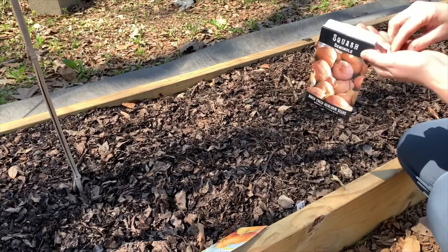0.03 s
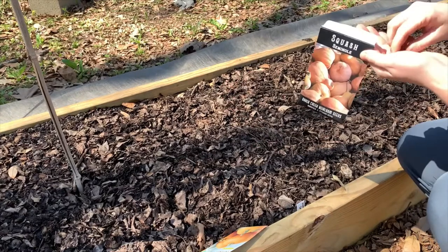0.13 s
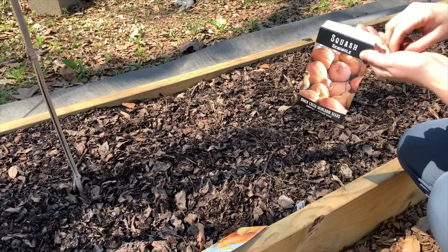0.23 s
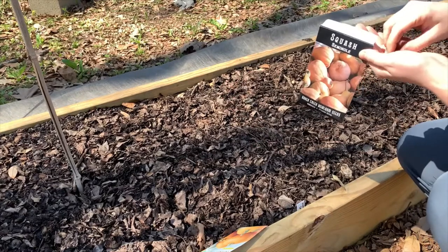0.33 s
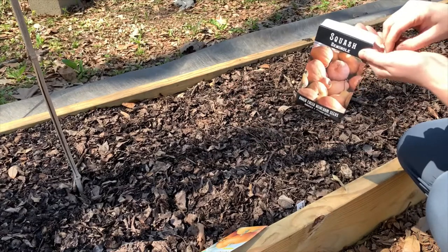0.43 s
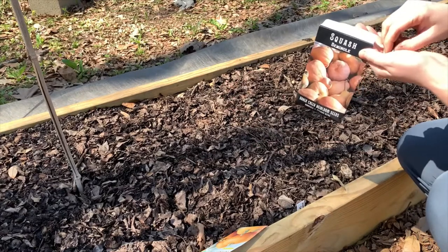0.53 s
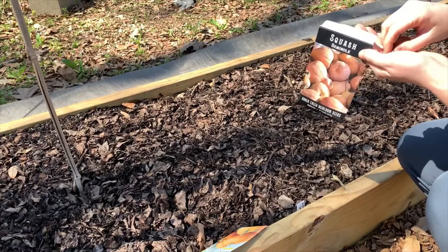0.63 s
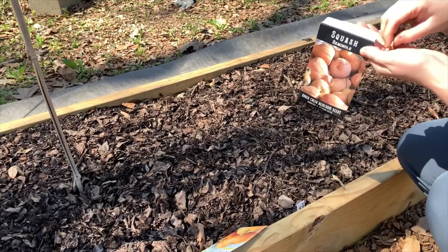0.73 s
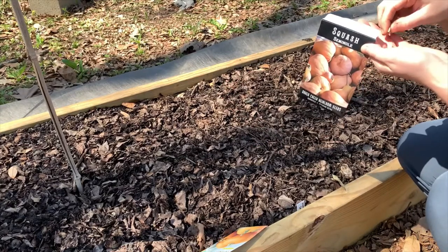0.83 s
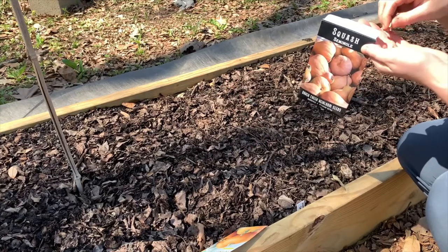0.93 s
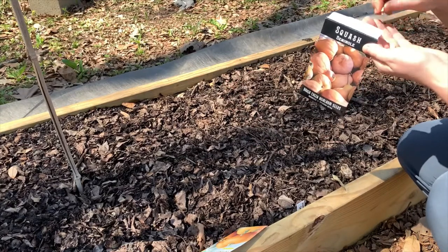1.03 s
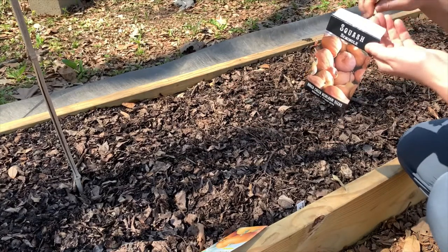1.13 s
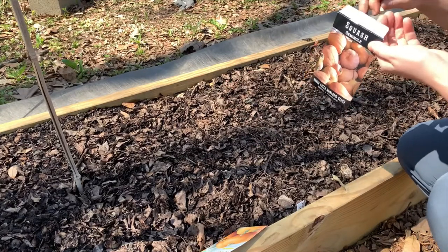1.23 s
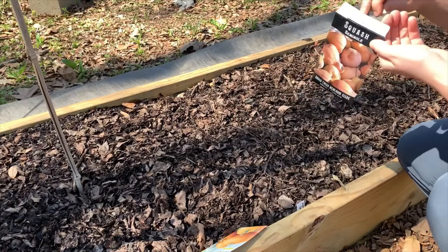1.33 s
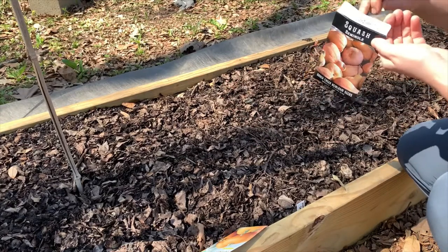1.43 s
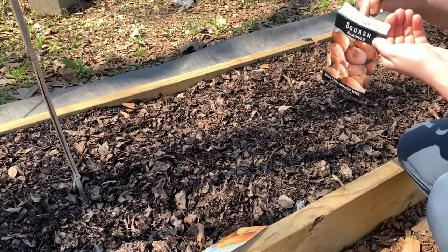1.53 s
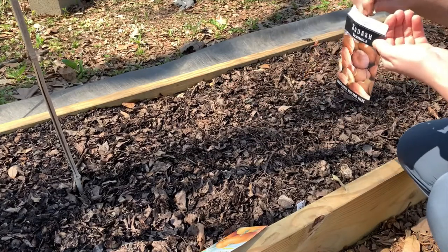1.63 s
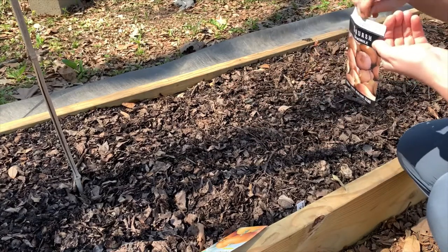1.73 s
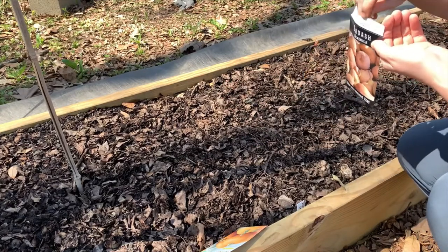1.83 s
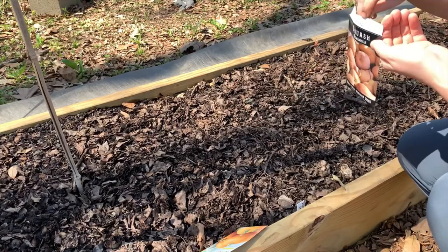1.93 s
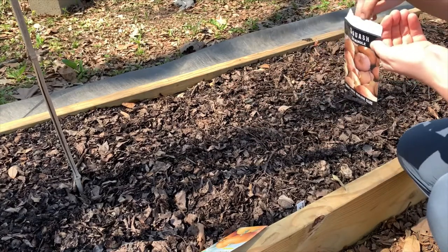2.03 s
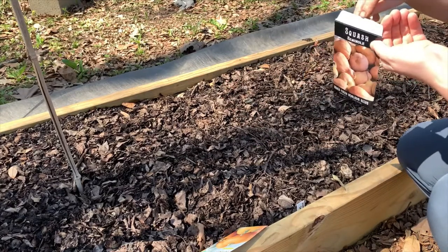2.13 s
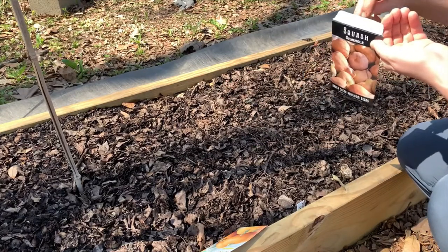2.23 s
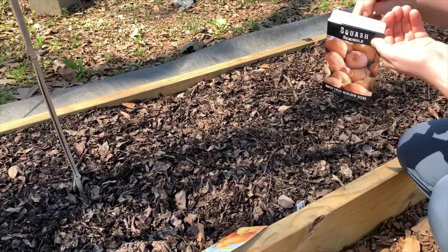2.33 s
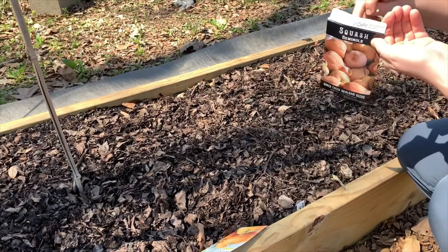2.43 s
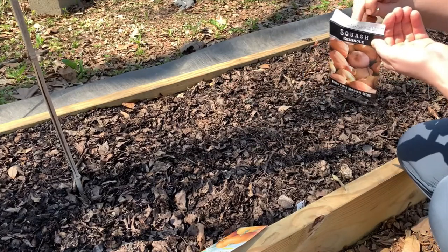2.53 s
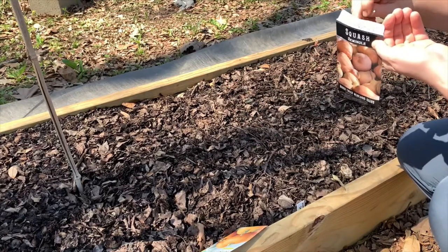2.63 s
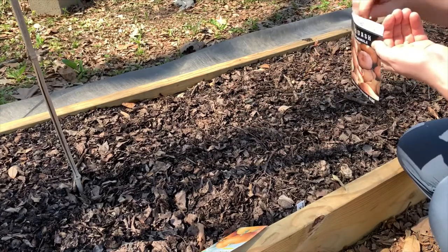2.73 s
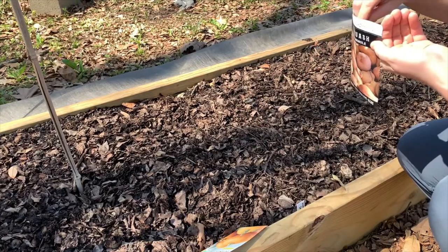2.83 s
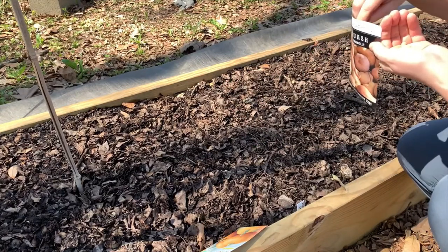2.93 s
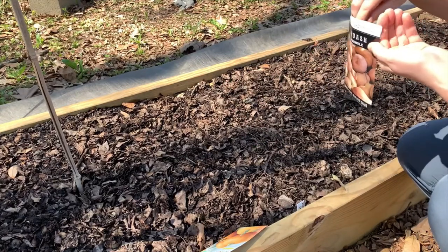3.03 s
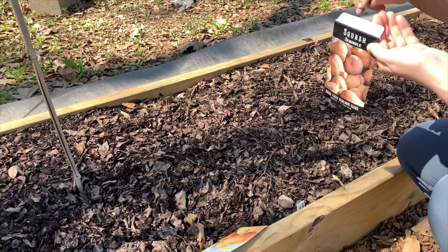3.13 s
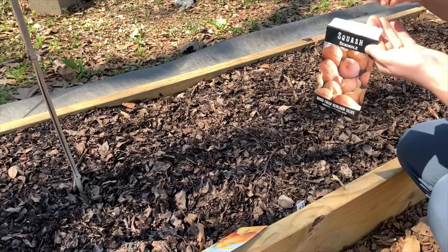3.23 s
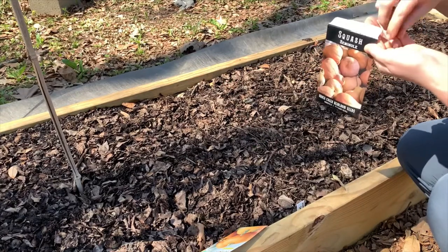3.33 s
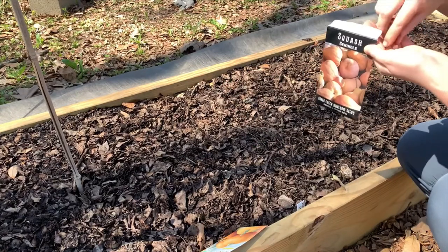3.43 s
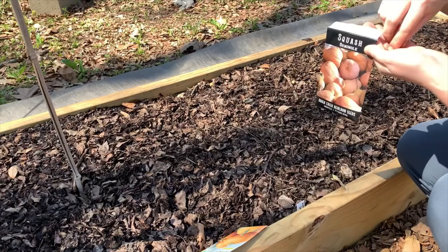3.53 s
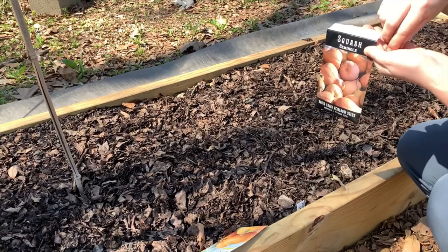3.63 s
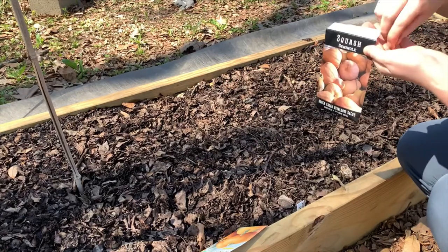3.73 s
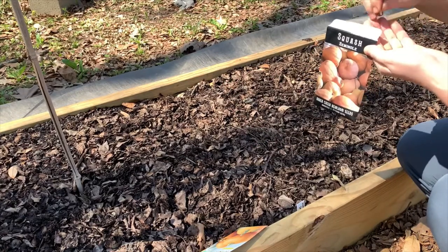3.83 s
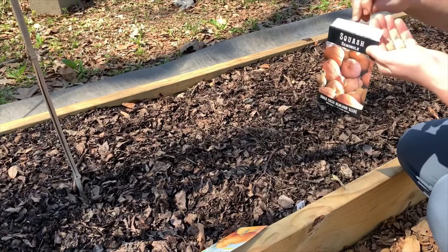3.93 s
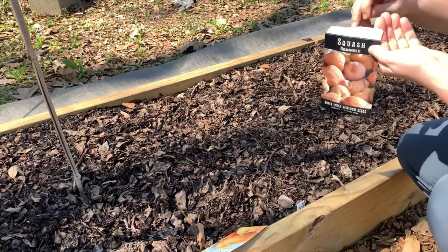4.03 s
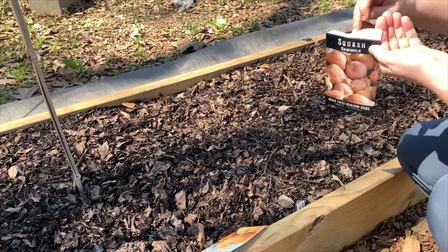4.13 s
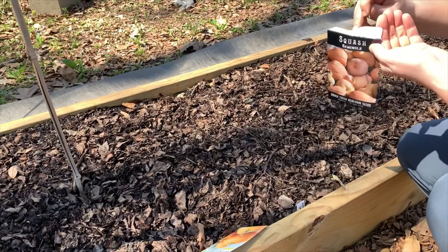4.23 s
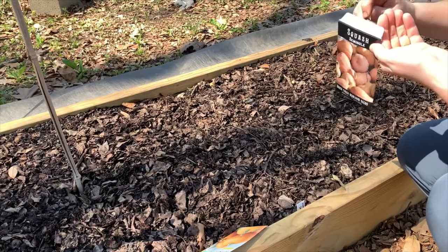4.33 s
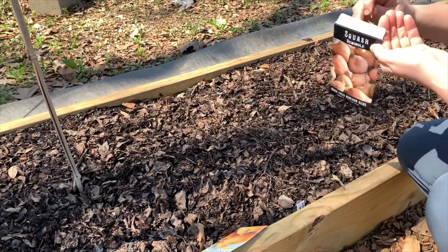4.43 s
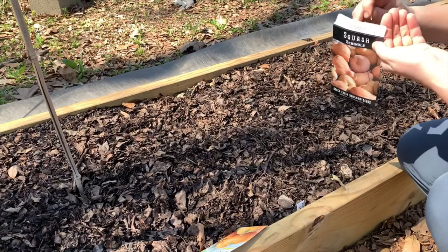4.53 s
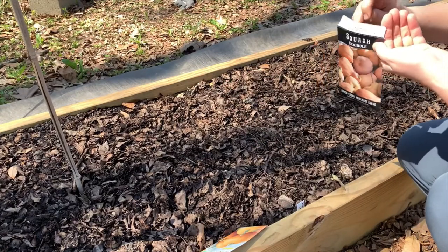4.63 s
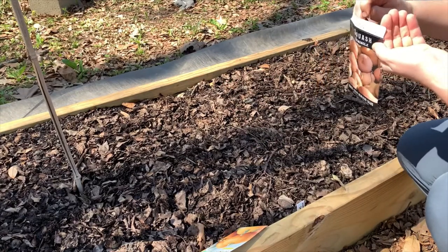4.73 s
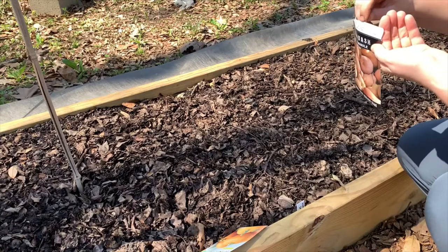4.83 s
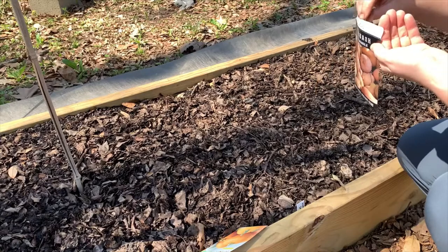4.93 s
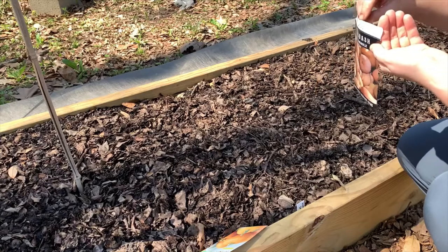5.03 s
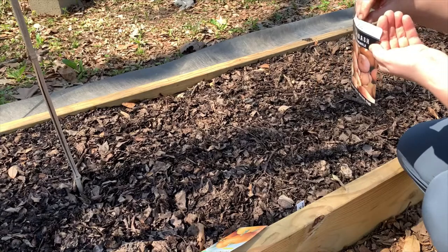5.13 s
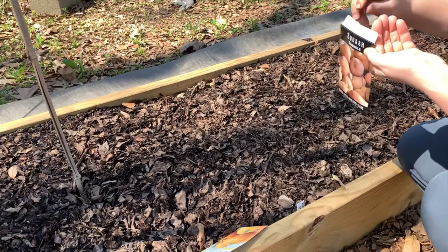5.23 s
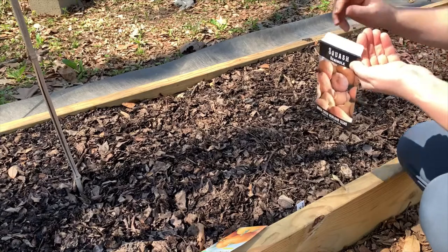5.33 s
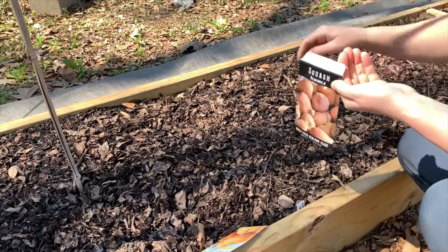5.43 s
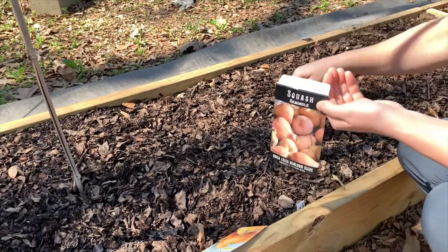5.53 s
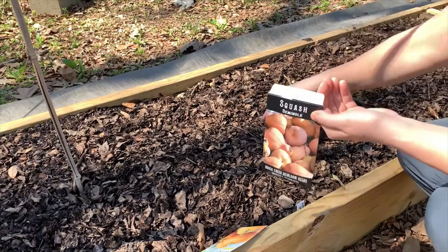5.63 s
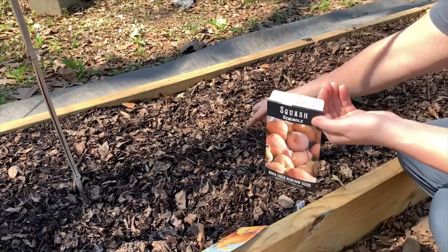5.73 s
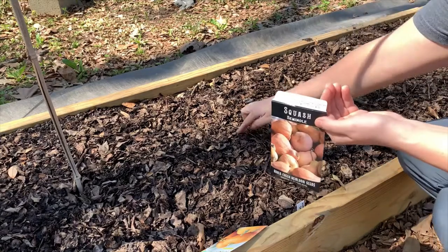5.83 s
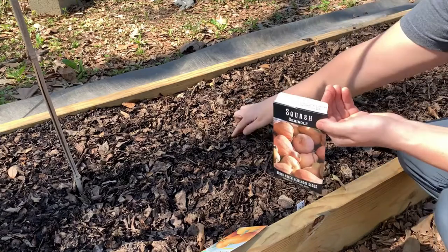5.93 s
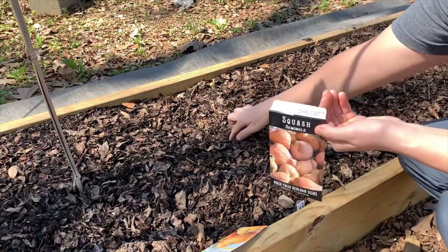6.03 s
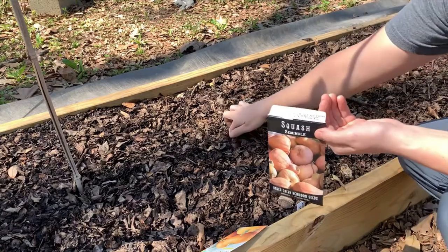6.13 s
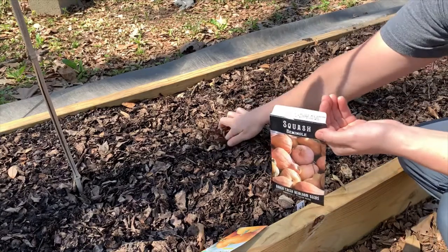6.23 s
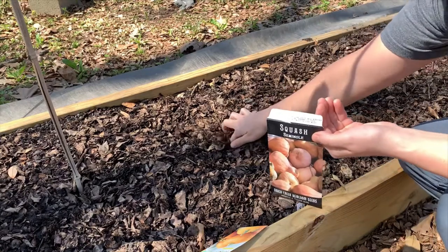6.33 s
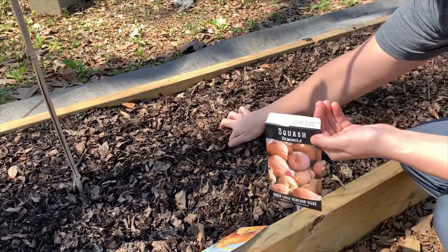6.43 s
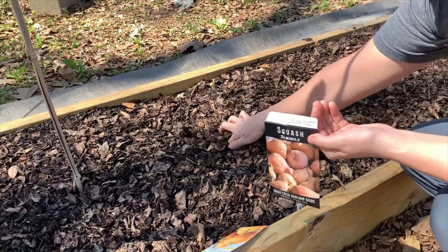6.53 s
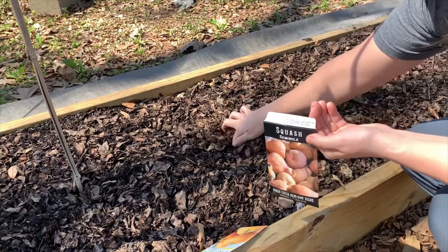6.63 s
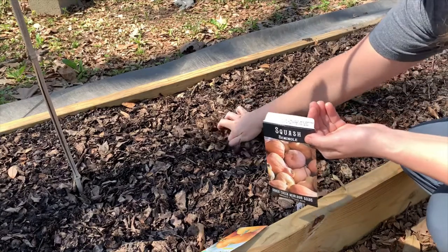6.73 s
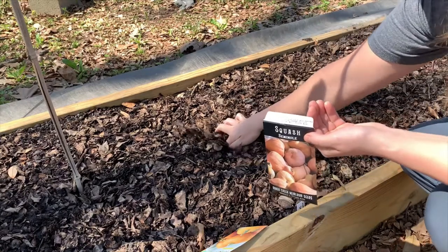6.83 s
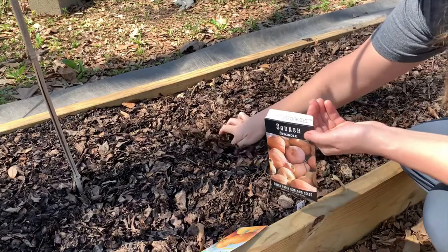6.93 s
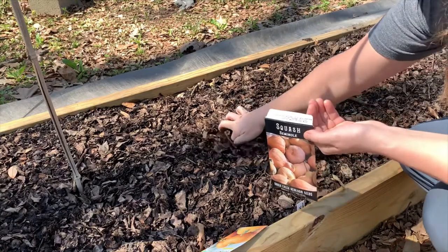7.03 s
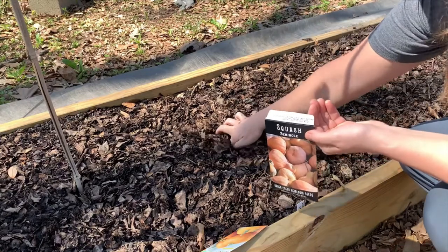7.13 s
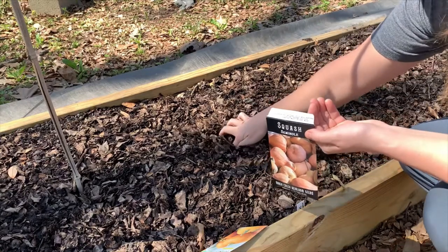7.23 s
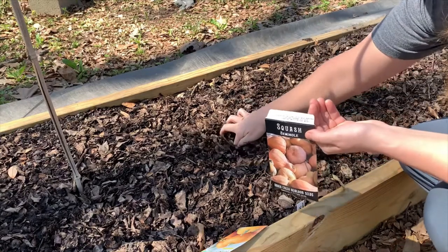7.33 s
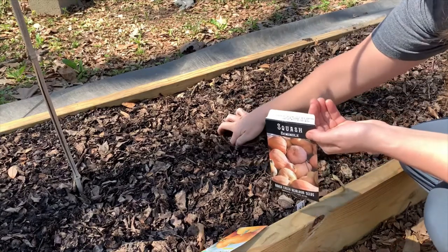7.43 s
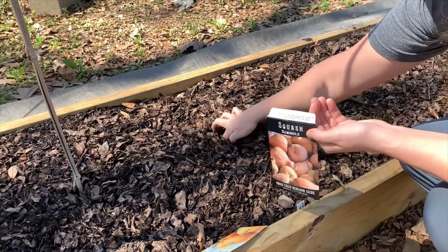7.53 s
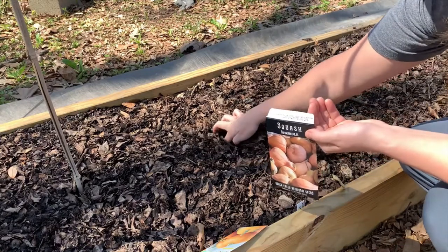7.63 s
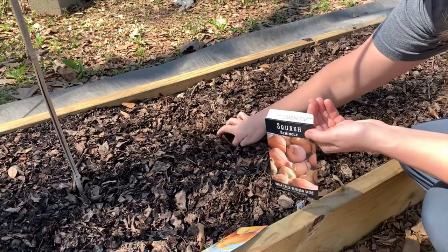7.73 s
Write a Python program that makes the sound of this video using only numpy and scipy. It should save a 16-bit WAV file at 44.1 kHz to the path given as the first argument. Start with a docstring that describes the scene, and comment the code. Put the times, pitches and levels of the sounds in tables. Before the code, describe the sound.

A paper packet rubs, crackles and snaps in the hand, then fingers scrape into dry mulch, over a low rumble of distant engines.

```python
"""A paper seed packet slides, crackles and snaps in a palm as fingers pick out seeds and push them
into dry mulch. Rubbing is many tiny cracks over a hiss; a snap is a crease giving way and ringing the
paper. It all happens close to a microphone with two openings (ports), which takes a few soft bumps.
Around the garden: a far low rumble, a wash of far traffic, two far engines and one falling bird
whistle, with faint microphone hiss on top."""
import sys
import numpy as np
from scipy import signal
from scipy.fft import rfft, irfft, next_fast_len
from scipy.io import wavfile
from scipy.ndimage import uniform_filter1d, map_coordinates

SR = 44100
rng = np.random.default_rng(int(sys.argv[2]) if len(sys.argv) > 2 else 0)


def master_out(mix):
    """Clip the mix to full scale and print it as 16-bit PCM to the path in sys.argv[1]."""
    frames = np.transpose(np.atleast_2d(mix))
    ceiling = np.clip(frames, -1, 1)
    pcm = np.round(ceiling * 32767).astype(np.int16)
    wavfile.write(sys.argv[1], SR, pcm)


N = 343695
TIME = np.arange(N) / SR


def amp(db):
    """Turns decibels into a gain to multiply by."""
    return np.exp(np.asarray(db) * np.log(10) / 20)


def unit(x):
    """Scales a sound so that the average of its channels has a strength (rms) of 1."""
    return x / np.sqrt(np.mean(np.atleast_2d(x).mean(0) ** 2) + 1e-20)


def over_time(rows):
    """Joins a table's points in time, giving one curve for each later column."""
    times, *columns = np.transpose(rows)
    return [np.interp(TIME, times, column) for column in columns]


def over_hz(rows, hz):
    """Reads a table's later columns at the given frequencies."""
    freqs, *columns = np.transpose(rows)
    return [np.interp(np.log(hz + 1), np.log(freqs), column) for column in columns]


def during(start, end):
    """1 between two times and 0 outside, with soft ends."""
    return uniform_filter1d(1. * ((TIME >= start) & (TIME <= end)), size=600)


def swells(rows):
    """A few smooth rises and falls in level, in dB."""
    return sum(db * np.exp(-((TIME - peak_s) / width_s) ** 2) for peak_s, width_s, db in rows)


def wander(rate_hz):
    """A random drift of strength 1: random points joined by straight lines."""
    points = rng.standard_normal(2048)
    return unit(np.interp(2 * rate_hz * TIME, np.arange(len(points)), points))


def add(mix, start_s, sound):
    """Mixes a sound in at the given time."""
    part = mix[max(round(start_s * SR), 0):][:len(sound)]
    part += sound[:len(part)]


def filtered(x, gain):
    """Multiplies each frequency of a sound by gain(hz)."""
    size = next_fast_len(x.shape[-1] + 2048)
    hz = np.fft.rfftfreq(size, 1 / SR)
    return irfft(rfft(x, size) * gain(hz), size)[..., :x.shape[-1]]


def colour_click(x, gain_db):
    """Shapes a click's tone so that it rings only afterwards (minimum phase)."""
    hz = abs(np.fft.fftfreq(len(x), 1 / SR))
    response = np.exp(np.conj(signal.hilbert(np.log(amp(gain_db(hz))))))
    return np.fft.ifft(np.fft.fft(x) * response).real


def mottled(x, depth_db, patch_hz, patch_s):
    """Lets small patches of low and high sound come and go at random."""
    hz, t, spectrum = signal.stft(x, SR, nperseg=512)
    grid = rng.standard_normal((256, 1024))
    places = np.meshgrid(hz / patch_hz, t / patch_s, indexing="ij")
    patches = map_coordinates(grid, places, order=1, mode="wrap")
    return signal.istft(spectrum * amp(depth_db * patches / patches.std()), SR, nperseg=512)[1][:, :N]


def at_ports(x, path):
    """A near sound reaches the two ports with different timing (phase) and level."""
    def gain(hz):
        phase, balance_db = over_hz(path, hz)
        half = np.array([[.5], [-.5]])
        return amp(half * balance_db) * np.exp(1j * half * phase)
    return filtered(x, gain)


def from_right(x, lag_s=.00028):
    """A far sound from the right reaches the left port a little later."""
    return filtered(x, lambda hz: np.exp(-2j * np.pi * hz * lag_s * np.array([[.5], [-.5]])))


def echoes(x, echo_db, fade_s, dull_hz):
    """Surfaces around throw back a short dull tail, which drops 60 dB in fade_s."""
    t = np.arange(8192) / SR
    tail = rng.standard_normal((2, len(t))) * amp(-60 * t / fade_s) * (1 - np.exp(-t / 0.0015))
    tail = signal.lfilter(*signal.butter(1, dull_hz, fs=SR), tail)
    tail /= np.linalg.norm(tail, axis=1, keepdims=True)
    return x + amp(echo_db) * signal.oaconvolve(x, tail, axes=1)[:, :N]


# Far traffic, and microphone hiss in the treble: frequency_hz, gain_db, left_right_likeness, right_lead_rad
WASH_TONE = [(59, 1.5, 0.87, -1), (186, 5.5, 0.67, 1.5), (354, -3, 0.67, 1), (550, -1, 0.52, 2),
             (790, 3, 0.47, 3), (1065, 1, 0.38, 3), (1595, -5, 0.6, 2.5), (2144, -14, 0.49, 1.18),
             (2764, -19.5, 0.97, 1.5), (3950, -33.5, 0.53, 1.5), (6760, -45, 1, 5), (11000, -42, 1, 0.5),
             (16000, -45, .85, 6)]
# Cars passing far off: peak_s, half_width_s, lift_db
PASSING_CARS = [(.1, 0.21, 1.4), (4.3, 0.45, 2.0), (5.45, 0.26, 1.5)]
def traffic_and_hiss(level_db=-50.0, waver_db=0.48):
    """A far, wavering wash of traffic from the side, with faint microphone hiss on top."""
    size = next_fast_len(N)
    db, likeness, phase = over_hz(WASH_TONE, np.fft.rfftfreq(size, 1 / SR))
    left, other = rfft(rng.standard_normal((2, size)))
    right = (likeness * left + np.sqrt(1 - likeness ** 2) * other) * np.exp(1j * phase)
    wash = irfft(np.array([left, right]) * amp(db))[:, :N]
    wash = mottled(wash, depth_db=1.5, patch_hz=110, patch_s=.07)
    return unit(wash) * amp(level_db + swells(PASSING_CARS) + waver_db * wander(2.3))


# The tone of the far rumble: frequency_hz, gain_db
RUMBLE_TONE = [(20, -28.5), (32, -18.5), (45, -6), (62, 1.5), (100, -0.5), (135, -3), (170, -14),
               (230, -26.5), (330, -29.5), (600, -42.5), (2000, -97.5)]
# Its swells: peak_s, half_width_s, lift_db
RUMBLE_SWELLS = [(.95, 0.87, 5), (1.8, 0.95, 3), (4.62, 0.33, 3.5)]
def far_rumble(level_db=-40.0, stereo_db=-9):
    """A far low rumble swells and sinks, nearly alike at both ports."""
    shared, side = rng.standard_normal((2, N))
    noise = shared + amp(stereo_db) * np.array([side, -side])
    rumble = filtered(noise, lambda hz: amp(over_hz(RUMBLE_TONE, hz)[0]))
    return unit(rumble) * amp(level_db + swells(RUMBLE_SWELLS) + 1.7 * wander(8))


# How loud the steady engine is: time_s, level_db
ENGINE_LEVEL = [(0, -37.5), (0.7, -38.5), (1.4, -38), (2.5, -39), (3.6, -41.5), (4.6, -39), (5.2, -42),
                (6.9, -43), (7.79, -46)]
# The tones in its hum: cycles_per_shaft_turn, gain_db
ENGINE_TONES = [(2, -11), (3, -0.5), (5, -19.5), (6, -17.5), (9, -28.5), (12, -27.5)]
def steady_engine(shaft_hz=30.89, waver_db=0.9):
    """Only a far engine's low tones carry this far; moving air makes them waver."""
    shaft = 2 * np.pi * shaft_hz * TIME
    hum = sum(amp(db + waver_db * wander(5.0)) * np.sin(cycles * shaft + 0.32 * wander(2.4))
              for cycles, db in ENGINE_TONES)
    return np.sqrt(2) * hum * amp(over_time(ENGINE_LEVEL)[0])


# Swells of the passing engine on the moving air: peak_s, half_width_s, lift_db
DRONE_SWELLS = [(1.6, 1, 5), (3.2, 0.22, 7), (4.65, 0.25, 6.5), (5.43, 0.11, 11), (6.85, 0.44, 6.5)]
def passing_engine(start_hz=136.67, sink_hz_per_s=1.95, level_db=-47.5, lower_db=-3, lower_ratio=.622):
    """A far engine drones on two tones that sink in pitch as it passes."""
    phase = 2 * np.pi * np.cumsum(start_hz - sink_hz_per_s * TIME) / SR
    upper = np.sin(phase + 0.19 * wander(5.5))
    lower = amp(lower_db) * np.sin(lower_ratio * phase + .5 * wander(4))
    return np.sqrt(2) * (upper + lower) * amp(level_db + swells(DRONE_SWELLS))


# The bird's whistle: time_s, pitch_hz, level_db (before gain_db)
WHISTLE = [(0.01, 6950, -82), (0.04, 6550, -75), (0.06, 5900, -75), (0.125, 5280, -74), (0.20, 4880, -72),
           (0.275, 4280, -76), (0.288, 3730, -62), (0.34, 3560, -58), (0.375, 3350, -53.5),
           (0.42, 3100, -60), (0.47, 2900, -64), (0.53, 2930, -68), (0.6, 2950, -84)]
def bird(gain_db=-2):
    """One pure falling whistle, faintly echoed by the trees."""
    hz, db = over_time(WHISTLE)
    wobbling_hz = hz * (1 + .008 * wander(110))
    song = np.sqrt(2) * np.sin(2 * np.pi * np.cumsum(wobbling_hz) / SR)
    song = song * amp(db + gain_db) * during(WHISTLE[0][0], WHISTLE[-1][0])
    return echoes(np.array([song, song]), echo_db=-10, fade_s=.25, dull_hz=6000)


# Soft thumps of the hands, hollow packet and microphone: start_s, level_db, middle_pitch_hz, fade_s
BUMPS = [(0.784, -26, 152.6, 0.36), (1.004, -28, 170, 0.023), (1.114, -27.5, 197, 0.073),
         (1.179, -15.5, 242, 0.046), (1.2, -24, 120, 0.06), (1.406, -36, 1120, 0.028),
         (1.467, -25.5, 156, 0.24), (1.66, -38.5, 706, 0.039), (2.026, -34, 191, 0.063),
         (2.254, -31, 130, .03), (2.288, -35, 575, 0.037), (2.29, -39, 398, 0.064),
         (2.673, -45, 616, 0.096), (2.678, -36, 290, 0.048), (4.169, -23.5, 88, 0.087),
         (4.177, -29.5, 542, 0.039), (4.18, -38, 376, 0.052), (4.291, -36, 476, 0.059),
         (4.503, -22.5, 103, 0.15), (4.628, -22, 95, 0.13)]
def bumps(sag=.6, sag_s=0.0049, rise_s=0.0017):
    """Each bump is a short low tone that drops from above its middle pitch to below it."""
    out, t = np.zeros(N), np.arange(6000) / SR
    for start_s, db, middle_hz, fade_s in BUMPS:
        hz = middle_hz * (1 - sag / 2 + sag * np.exp(-t / sag_s))
        loudness = amp(db - 60 * t / fade_s) * (1 - np.exp(-t / rise_s))
        add(out, start_s, np.sin(2 * np.pi * np.cumsum(hz) / SR) * loudness)
    return out


def crack(swell_s, break_db, ring_db, ring_s):
    """Tiny fractures build up to one sharp break and die away, leaving a faint ring."""
    t = np.arange(4096) / SR
    progress = t / swell_s
    ring = np.minimum(progress, 1) * amp(ring_db - 60 * t / ring_s)
    swell = (progress * np.exp(1 - progress)) ** 2 + ring
    burst = swell * rng.standard_normal(len(t))
    burst[np.argmax(swell)] = amp(break_db) * np.linalg.norm(burst) * rng.choice([-1, 1])
    power = uniform_filter1d(abs(np.fft.fft(burst)) ** 2, size=81, mode="wrap")
    burst = colour_click(burst, lambda hz: -10 * np.log10(power + 1e-9))  # evens out the tone
    return burst / np.linalg.norm(burst) * np.sqrt(.005 * SR)  # the energy of 5 ms at strength 1


def friction(slips_per_s, slip_s, break_db, spread_db, hiss_db, clump_db, shift_db, stereo_db):
    """Rubbing: countless tiny uneven cracks, in clumps, over the hiss of fibres."""
    sizes = amp(spread_db * np.minimum(rng.exponential(1, N), 4))
    sizes *= rng.random(N) < slips_per_s / SR
    shapes = rng.integers(0, 10, N)
    slips = np.zeros(N)
    for shape in range(10):
        tick = crack(slip_s, break_db, ring_db=-26, ring_s=.015)
        slips += signal.oaconvolve(sizes * (shapes == shape), tick)[:N]
    hiss, side = rng.standard_normal((2, N))
    rub = unit(slips) + amp(hiss_db) * hiss + amp(stereo_db) * np.array([side, -side])
    rub *= amp(clump_db * wander(70))
    # as the contact moves, each half octave comes and goes on its own
    size = next_fast_len(N)
    spectrum = rfft(rub, size)
    octaves = np.log2(np.clip(np.fft.rfftfreq(size, 1 / SR), 2000, 16000) / 2000)
    bands = (np.maximum(1 - abs(2 * octaves - band), 0) for band in range(7))
    return sum(irfft(spectrum * band, size)[:, :N] * amp(shift_db * wander(35)) for band in bands)


def strokes(starts, lengths, levels_db, rise_s, slope_db_per_s, fade_db_per_s):
    """The loudness of a run of rubs: each rises, slopes up or down while it lasts, then dies away."""
    power, t = np.zeros(N), np.arange(SR // 2) / SR
    for start_s, length_s, db in zip(starts, lengths, levels_db):
        fade_db = fade_db_per_s * np.maximum(t - length_s, 0)
        gain = np.minimum(t / rise_s, 1) * amp(db + slope_db_per_s * t - fade_db)
        add(power, start_s, gain ** 2)
    return np.sqrt(power)


# The tone of dry mulch: frequency_hz, gain_db
MULCH_TONE = [(300, -20), (1500, -5), (3500, -7.5), (5500, -6), (6900, -.5), (7600, -2), (8800, 3),
              (9800, .5), (10900, 0), (13200, .5), (15700, 1)]
# How the mulch reaches the two ports: frequency_hz, left_lead_rad, left_over_right_db
MULCH_PATH = [(300, 0, 0), (4500, -1.4, -4), (5600, -1.5, -4), (6600, -.7, 0), (8500, -3.1, 0),
              (11200, -6.3, 0), (13400, -9.4, 0), (15900, -12.5, 0)]
# Fingers pushing in: start_s, length_s, level_db (before rub_db)
PUSHES = [(5.872, 0.19, -68.5), (6.097, 0.062, -59), (6.192, 0.044, -51), (6.267, 0.23, -60),
          (6.56, 0.17, -67), (6.712, 0.22, -59.5), (6.936, 0.11, -66), (7.084, 0.2, -70.5),
          (7.48, 0.07, -66), (7.663, 0.091, -63.5)]
# Chips cracking: start_s, level_db (before crack_db)
CHIP_CRACKS = [(5.894, -64), (6.035, -61), (6.0783, -46.5), (6.134, -42), (6.159, -56), (6.217, -51),
               (6.233, -50), (6.2374, -42), (6.385, -57), (6.4482, -38), (6.4566, -52), (6.593, -64),
               (6.644, -65), (6.6985, -64), (6.757, -53), (6.8355, -50), (6.9196, -52), (7.047, -60),
               (7.2766, -66), (7.4806, -46.5), (7.486, -55), (7.504, -52), (7.551, -63), (7.5857, -57.5),
               (7.726, -54)]
def mulch(rub_db=-1.5, crack_db=-5.5):
    """Dry chips scrape past the fingers, and now and then one cracks."""
    def tone_db(hz):
        return over_hz(MULCH_TONE, hz)[0]
    slips = friction(slips_per_s=220, slip_s=.0003, break_db=3, spread_db=3.5,
                     hiss_db=-3.5, clump_db=.9, shift_db=1.3, stereo_db=-8)
    slips = mottled(slips, depth_db=2.7, patch_hz=400, patch_s=.018)
    rub = unit(at_ports(filtered(slips, lambda hz: amp(tone_db(hz))), MULCH_PATH))
    cracks = np.zeros(N)
    for start_s, db in CHIP_CRACKS:
        tick = crack(swell_s=0.0006, break_db=4, ring_db=-24, ring_s=0.016)
        add(cracks, start_s, amp(db + crack_db) * colour_click(tick, tone_db))
    pushing = strokes(*np.transpose(PUSHES), rise_s=0.04, slope_db_per_s=6, fade_db_per_s=256)
    settling = amp(-82.5) * during(5.89, N / SR)  # chips keep shifting between pushes
    return rub * amp(rub_db) * np.hypot(pushing, settling) + at_ports(cracks, MULCH_PATH)


# Pitches at which the packet likes to ring: pitch_hz, width_hz, lift_db
PAPER_RINGS = [(1290, 1100, 2), (2230, 190, 4), (3060, 260, 2.5), (3830, 400, -3), (4700, 330, 5.5),
               (5260, 270, 3.5), (6300, 720, 0.5)]
def paper_ring_db(hz):
    """How much the packet's ringing lifts or lowers each frequency."""
    return sum(db / (1 + (2 * (hz - pitch_hz) / width_hz) ** 2) for pitch_hz, width_hz, db in PAPER_RINGS)


def flexing(x, octaves=.13, bends_per_s=7):
    """The packet's ringing slides up and down as the hand bends it."""
    hz, t, spectrum = signal.stft(x, SR, nperseg=512)
    pitch_ratio = np.interp(t, TIME, 2 ** (octaves * wander(bends_per_s)))
    ringing = amp(paper_ring_db(hz[:, None] / pitch_ratio))
    return signal.istft(spectrum * ringing, SR, nperseg=512)[1][:, :N]


# Strokes of paper against the hands: start_s, length_s, level_db, extra_treble_db
PAPER_STROKES = [(0.075, 0.098, -87, 11), (0.528, 0.03, -77, 5), (0.712, 0.066, -76, -5),
                 (1.125, 0.038, -76, 5), (1.172, 0.42, -76.5, -3), (1.526, 0.043, -60, 4),
                 (1.558, 0.037, -58.5, 5), (1.605, 0.076, -67, -3), (1.701, 0.048, -69.5, 1),
                 (1.984, 0.12, -64, 3.5), (2.138, 0.18, -73.5, -5), (2.313, 0.026, -60.5, -6),
                 (2.426, 0.071, -66, 6.5), (2.508, .05, -69, -5), (2.56, 0.04, -59, 10),
                 (2.597, 0.042, -60.5, 5), (2.65, 0.027, -53.5, -8), (2.697, 0.11, -64.5, 3.5),
                 (2.805, 0.14, -72.5, -8), (2.974, 0.15, -66, 7.5), (3.091, 0.045, -53, 3.5),
                 (3.153, 0.028, -55.5, -10), (3.2, 0.064, -76, -16), (3.477, 0.052, -71, -1),
                 (3.757, 0.026, -70, 1.5), (3.955, 0.026, -58.5, 0), (3.998, 0.092, -71.5, -19),
                 (4.15, 0.1, -68, -3), (4.26, 0.098, -61.5, -5), (4.376, 0.16, -65.5, -2.5),
                 (4.529, 0.063, -60, 1), (4.624, 0.064, -62, -0.5), (4.683, 0.11, -72, -5),
                 (4.77, 0.16, -69, 0.5), (5.201, 0.071, -65, 7)]
def paper_rubbing(held_db=-86.5, held_treble_db=-13.5):
    """How hard the paper rubs over time: one gain for the scrape and one for its treble."""
    starts, lengths, db, treble_db = np.transpose(PAPER_STROKES)
    shape = dict(rise_s=0.03, slope_db_per_s=-26, fade_db_per_s=438)
    held = amp(held_db) * during(1.8, 5.35)  # between strokes the packet still creeps on the skin
    scrape_gain = np.hypot(strokes(starts, lengths, db, **shape), held)
    treble_gain = np.hypot(strokes(starts, lengths, db + treble_db, **shape), held * amp(held_treble_db))
    return scrape_gain, treble_gain


# The tone of sliding paper: frequency_hz, gain_db
SLIDE_TONE = [(150, -20), (400, 4), (1000, 3), (2000, 4), (3300, 4), (4800, 0), (6000, 1), (7600, 0),
              (8800, 2), (10800, -2), (13000, -2), (15500, -1)]
# How the packet reaches the two ports: frequency_hz, left_lead_rad, left_over_right_db
PACKET_PATH = [(300, 0, 0), (1500, -.6, -1), (3300, -.3, -4), (4600, -.7, -7), (5600, -1.6, -6),
               (6800, -1.4, -1), (8300, -2.9, 1), (11200, -6.3, 1), (13400, -9.4, 1), (15800, -12.5, 1)]
def packet_slide(scrape_gain, treble_gain, scrape_db=4, split_hz=7500):
    """Paper rubs on skin and rings in shifting patches; some strokes are brighter than others."""
    slips = friction(slips_per_s=520, slip_s=.0005, break_db=-8, spread_db=3.2,
                     hiss_db=-1, clump_db=1.1, shift_db=1.5, stereo_db=-7)
    slips = mottled(slips, depth_db=2.9, patch_hz=240, patch_s=.02)
    paper = filtered(slips, lambda hz: amp(over_hz(SLIDE_TONE, hz)[0]))
    rub = at_ports(flexing(paper), PACKET_PATH)
    scrape = filtered(rub, lambda hz: 1 / (1 + (hz / split_hz) ** 8))
    return unit(scrape) * amp(scrape_db) * scrape_gain + unit(rub - scrape) * treble_gain


# Rasps in the firmest strokes: start_s, length_s, level_db, start_pitch_hz, end_pitch_hz
RASPS = [(1.565, 0.058, -53, 3300, 3050), (1.568, 0.042, -55, 4670, 5100),
         (2.598, 0.064, -52.5, 3380, 2940), (2.613, 0.038, -55, 3920, 4400), (2.67, 0.038, -56, 1900, 1800),
         (3.105, 0.05, -52.5, 2100, 1800), (4.545, .04, -56.5, 3320, 3500), (4.64, .04, -61, 4900, 4500),
         (5.105, 0.012, -49.5, 2500, 2330)]
def packet_rasps(width_hz=2000, slips_per_s=2500):
    """Pressed firmly, the paper chatters and rings one panel, whose pitch glides as it bends."""
    out, decay = np.zeros(N), np.exp(-np.pi * width_hz / SR)
    slips = rng.standard_normal(N) * (rng.random(N) < slips_per_s / SR)
    for start_s, length_s, db, start_hz, end_hz in RASPS:
        progress = np.linspace(0, 1, round(length_s * SR))
        glide = np.exp(2j * np.pi * np.cumsum(start_hz + (end_hz - start_hz) * progress) / SR)
        chatter = slips[round(start_s * SR):][:len(progress)]
        # keeps the part of the chatter near the gliding pitch
        ring = (glide * signal.lfilter([1], np.poly([decay, decay]), chatter / glide)).real
        add(out, start_s, unit(ring) * np.sin(np.pi * progress) * amp(db))
    return at_ports(out, PACKET_PATH)


def crinkles(scrape_gain, start_s=0.97, end_s=5.35, per_s=25, swell_s=0.0015, panel_hz=3400):
    """Small creases give way at random, louder when the paper rubs harder; gives rows like SNAPS."""
    times = start_s + (np.arange(200) + rng.random(200)) / per_s
    lifts_db = -2.5 + 2 * rng.standard_normal(200)
    pitches = panel_hz * 2 ** (0.34 * rng.standard_normal(200))
    return [(s, 20 * np.log10(scrape_gain[round(s * SR)] + 1e-9) + lift_db, 0, swell_s, hz)
            for s, lift_db, hz in zip(times, lifts_db, pitches) if s < end_s]


# The tone of a snap: frequency_hz, gain_db
SNAP_TONE = [(120, -20), (300, -3), (500, 3), (750, 0), (1600, 2), (2600, -1), (3400, 3), (4800, -2),
             (7400, -5), (8600, 2), (11500, -3), (12500, -6), (14500, -4), (16500, -15)]
# Creases snapping: start_s, level_db (before gain_db), treble_db (before bright_db), swell_s, pitch_hz
SNAPS = [(.7309, -69, -5, 0.0021, 4400), (1.4042, -45, -28, 0.0026, 3240),
         (1.4075, -46.5, -43, 0.0019, 1190), (1.659, -44.5, -27, 0.0008, 2000),
         (1.731, -63.5, 5, 0.00066, 4430), (1.927, -59.5, -2, 0.0011, 2700), (1.951, -58, 0, 0.0028, 3020),
         (1.993, -62, 2, 0.0018, 3000), (2.0146, -53, 1, 0.0005, 3100), (2.0183, -53, 1, .0007, 2800),
         (2.0255, -40, 0, 0.0013, 3140), (2.047, -59, 2, 0.00079, 3200), (2.0585, -61, 0, .001, 3600),
         (2.158, -62.5, -17, 0.00086, 4700), (2.2528, -41.5, -5.5, 0.0012, 1390),
         (2.2575, -52, -9, 0.001, 950), (2.2868, -33, 2, 0.00067, 2160), (2.2895, -41, -14, 0.00098, 2190),
         (2.4994, -51, -32, 0.00065, 3260), (2.5978, -56, 4, .0007, 3300), (2.672, -51, -2, .0018, 2000),
         (3.031, -57, -1, 0.00079, 2000), (3.0595, -64, 8, .0007, 3000), (3.102, -45, -6, 0.00087, 1970),
         (3.181, -56, -6, 0.0017, 2780), (3.7845, -54, 0, 0.0019, 2870), (3.792, -54.5, 2, .0012, 2850),
         (3.9625, -46, -18, 0.00092, 2500), (3.974, -55, -5, 0.0012, 3000),
         (3.983, -48.5, -11, 0.0023, 3260), (4.1756, -29, -10, 0.0017, 4400),
         (4.1795, -40, -11, 0.0019, 3500), (4.187, -49, -12, .002, 3500), (4.2895, -39, -5, 0.003, 2020),
         (4.362, -49, -29, 0.0013, 5000), (4.566, -56, -6, 0.00086, 3420),
         (4.8945, -45.5, -19, 0.0012, 2070), (4.92, -52.5, -9, 0.00086, 4240),
         (5.025, -56, -6, 0.0012, 2690), (5.033, -55.5, -5, 0.0018, 2700), (5.074, -66, 3, 0.0017, 3000),
         (5.1018, -58, 4, 0.00073, 2400), (5.1083, -45, -5.5, 0.0016, 2370),
         (5.1408, -56, -6, 0.00069, 2700), (5.304, -61.5, -9, 0.0021, 4500)]
def packet_snaps(small_snaps, gain_db=2.0, split_hz=7500, bright_db=7, panel_db=7.5, panel_width=0.15):
    """A crease buckles in a quick run of cracks that ring one panel of the paper."""
    out = np.zeros(N)
    for start_s, db, treble_db, swell_s, pitch_hz in [*SNAPS, *small_snaps]:
        def tone_db(hz):
            highs = 1 - 1 / (1 + (hz / split_hz) ** 6)
            panel = panel_db / (1 + (2 * (hz / pitch_hz - 1) / panel_width) ** 2)
            return over_hz(SNAP_TONE, hz)[0] + paper_ring_db(hz) + panel + highs * (treble_db + bright_db)
        snap = crack(swell_s, break_db=-6, ring_db=-16.5, ring_s=.03)
        add(out, start_s, amp(db + gain_db) * colour_click(snap, tone_db))
    return at_ports(out, PACKET_PATH)


def packet():
    """The whole packet: sliding, rasping, loud snaps and the crinkles that the sliding sets off."""
    scrape_gain, treble_gain = paper_rubbing()
    return packet_slide(scrape_gain, treble_gain) + packet_rasps() + packet_snaps(crinkles(scrape_gain))


def scene():
    """The hands close by, and the garden around them."""
    hands = echoes(packet() + mulch(), echo_db=-8.5, fade_s=0.055, dull_hz=3570)
    garden = bird() + from_right(steady_engine() + passing_engine() + far_rumble())
    return hands + bumps() + garden + traffic_and_hiss()


def record(dry):
    """Cuts away the very highest treble."""
    low_pass = signal.firwin(301, cutoff=16100, window=("kaiser", 8), fs=SR)
    return signal.oaconvolve(dry, low_pass[None], "same")


dry = scene()
out = record(dry)
master_out(out)
```